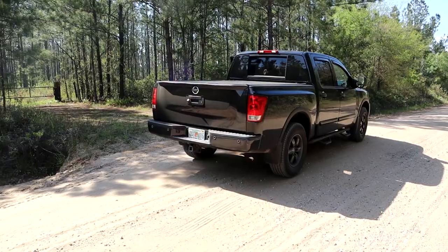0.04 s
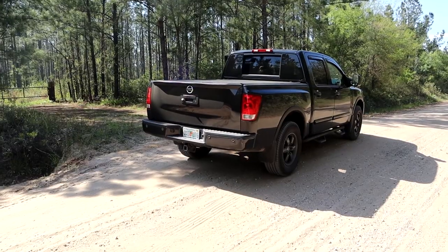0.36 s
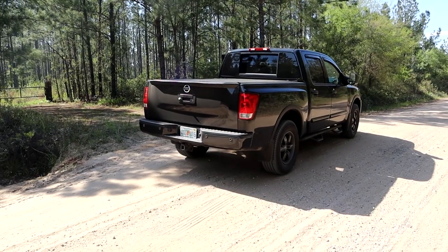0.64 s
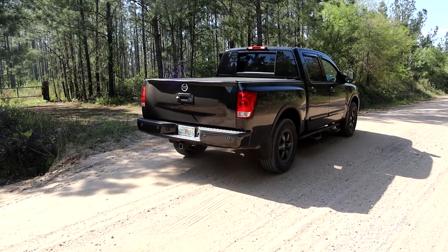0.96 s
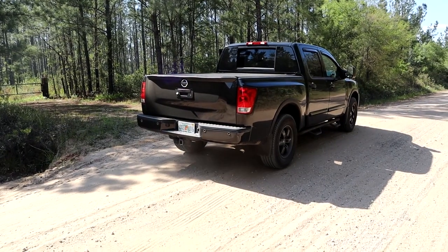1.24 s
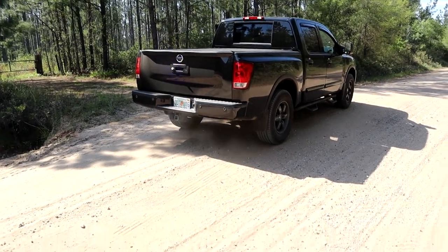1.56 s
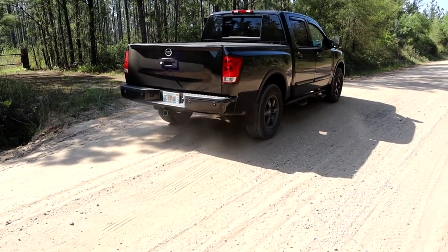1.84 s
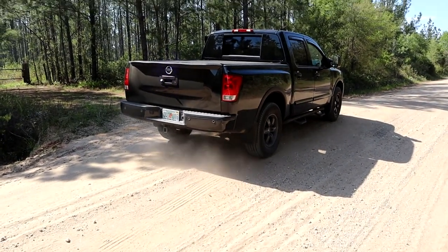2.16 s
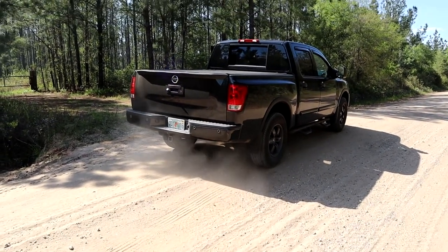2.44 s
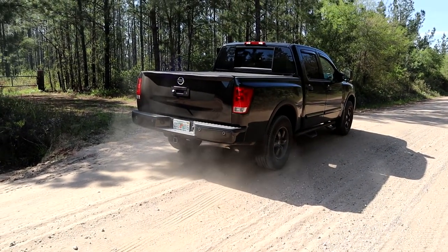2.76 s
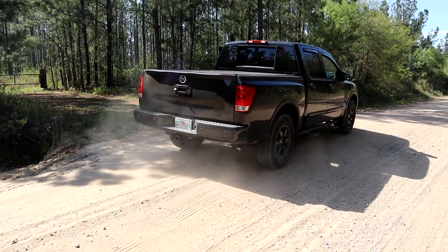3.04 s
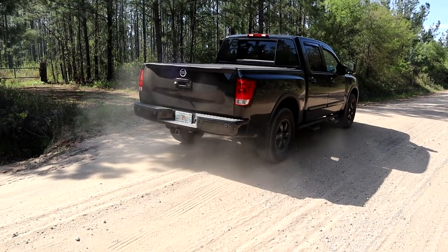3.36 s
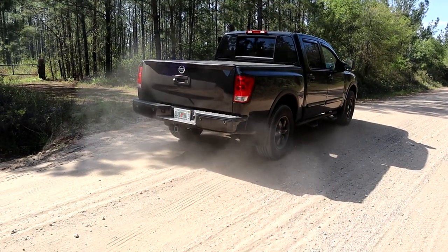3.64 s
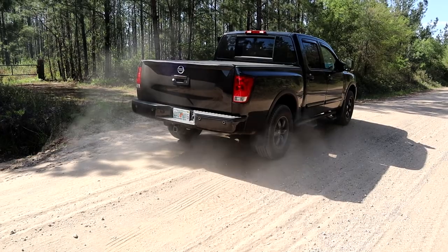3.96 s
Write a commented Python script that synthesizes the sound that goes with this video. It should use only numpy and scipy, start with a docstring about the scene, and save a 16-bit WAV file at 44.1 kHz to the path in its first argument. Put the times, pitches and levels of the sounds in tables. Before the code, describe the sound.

A pickup's V8 revs up from idle in growling stabs, backfires, then winds down.

```python
"""A V8 pickup idles on a sandy road a few metres away, its engine bay whirring, as an insect trills briefly.
At 0.4 s air hisses into the intake, the pipe pops and the revs climb: separate chugs merge into a note,
with a rasp of gas under load. From 1.3 s stabs of throttle spin the rear wheels, which spray sand,
and the tailpipe growls on after each stab. The exhaust burbles on the overrun and backfires at 2.5 s.
After one more stab the revs fall away, with two soft pops near the end."""
import sys
import numpy as np
from scipy import signal
from scipy.fft import rfft, irfft
from scipy.io import wavfile

SR = 44100
rng = np.random.default_rng(int(sys.argv[2]) if len(sys.argv) > 2 else 0)


def transcribe(u):
    """Save the signal u as a 16-bit wav file named by the first command-line argument.

    u: samples, shape (n,) or (channels, n), limited to [-1, 1]; the rate is SR.
    q: integer samples, one column per channel.
    """
    v = np.clip(np.atleast_2d(u).T, -1, 1)
    q = np.round(v * 32767).astype(np.int16)
    wavfile.write(sys.argv[1], SR, q)


N = 176400
T = np.arange(N) / SR

# Fader ride for the exhaust note and its puffs: (time [s], level [dB])
EXHAUST_FADER = [(0, -23.5), (.385, -15), (.405, -8.5), (.5, -9.5), (.7, -9.5), (.8, -13.5), (.95, -21.5),
                 (1.1, -23.5), (1.33, -21), (1.38, -11), (1.55, -17.5), (1.64, -9), (1.75, -15.5),
                 (1.83, -10), (1.95, -14.5), (2.05, -17.5), (2.25, -17.5), (2.44, -11.5), (2.57, -28.5),
                 (2.63, -16), (2.71, -10.5), (2.87, -20.5), (3.08, -19), (3.15, -15), (3.45, -20.5),
                 (3.75, -16), (3.87, -17.5), (4, -14)]
# Body of the pipe and muffler: (frequency [Hz], gain [dB])
PIPE_BODY = [(50.0, 1.5), (80.0, -0.5), (115.0, 6.5), (140.0, 4), (162.0, 7), (190.0, 7), (220.0, -0.8),
             (255.0, 0.47), (300.0, -8), (345.0, -25), (385.0, -23), (460.0, -35.5), (545.0, -26.5),
             (590.0, -29.5), (660.0, -22.5), (760.0, -30), (850.0, -34.5), (1000.0, -46)]
# Voicing of the low harmonics: (multiple of the cycle rate, overrun level [dB], loaded level [dB])
HARMONIC_VOICING = [(2, -29.7, -29.5), (3, -10, -21.5), (4, -14.5, -17.5), (5, -9.5, -6.5), (6, -14.5, -4),
                    (7, -16, -18.5), (8, -10, -0.4), (9, -8, -1.3), (10, -9.6, -2.5), (11, -16.5, -3),
                    (12, -8.5, -0.3), (13, -6.5, 11)]
# The V8's lopsided beat, in firing order: (strength [0-1], share of the bank lag [0-1])
FIRING_PATTERN = [(.9, 0.19), (.15, 0.99), (0.92, 0.98), (.7, 0.047), (.2, 1), (.6, 0.03), (.15, 0.022),
                  (.9, 1)]
BANK_LAG_CYCLES, FULL_LOAD_THROTTLE, LOAD_BRIGHT_DB = .012, .48, 5.5
THUMP_HZ, THUMP_Q, CHUG_HZ, CHUG_Q, CHUG_GAIN, MUFFLER_HZ = 71, .9, 164, 3.3, 2.05, 263
UPPER_DB, UPPER_OVERRUN_DB, UPPER_CONTRAST = 1, -11, 0.44
JITTER_S, OVERRUN_JITTER_S, FIRING_SPREAD_DB, IDLE_SPREAD_DB = .00005, 0.000088, .6, 1.5


def exhaust(rate, cycles, throttle, trim_db=0.28, ceiling=.85):
    """At low revs each firing is a thump and an uneven chug; at speed they merge into a load-shaped note."""
    step = 8  # the note is low, so it is built at an eighth of the sample rate
    rate, cycles, throttle = rate[::step], cycles[::step], throttle[::step]
    load = np.clip(throttle / FULL_LOAD_THROTTLE, 0, 1)
    idle = np.interp(rate, [15, 22], [1, 0])
    # no two firings have quite the same size or timing
    size, slip = [np.interp(8 * cycles, np.arange(1500), v) for v in rng.standard_normal((2, 1500))]
    cycles = cycles + (JITTER_S + OVERRUN_JITTER_S * (1 - load)) * rate * slip
    strength, bank = np.transpose(FIRING_PATTERN)
    fires_at = np.arange(8) / 8 + BANK_LAG_CYCLES * bank
    pipe, pipe_hz = causal_response(PIPE_BODY)[:4096], np.fft.rfftfreq(8192, 1 / SR)[:4096]
    out, power = 0, 0
    for k in range(2, 56):
        hz = k * rate
        pattern = np.sum(strength * np.exp(-2j * np.pi * k * fires_at))
        thump = 8 * (k % 8 == 0) * resonance(hz, THUMP_HZ, THUMP_Q)
        chug = CHUG_GAIN * pattern * resonance(hz, CHUG_HZ, CHUG_Q)
        beat = (1j * thump + chug) / (1 + (hz / MUFFLER_HZ) ** 6)
        if k - 2 < len(HARMONIC_VOICING):
            _, overrun_db, load_db = HARMONIC_VOICING[k - 2]
        else:  # upper harmonics follow the firing pattern
            load_db = UPPER_DB + UPPER_CONTRAST * 20 * np.log10(abs(pattern) + 1e-6)
            overrun_db = load_db + UPPER_OVERRUN_DB
        body = np.interp(hz, pipe_hz, pipe)
        bright_db = LOAD_BRIGHT_DB * throttle * np.interp(hz, [200, 600], [0, 1])
        note = amp(overrun_db + (load_db - overrun_db) * load + bright_db) * np.exp(body.real)
        gain = note ** (1 - idle) * abs(beat) ** idle * np.interp(hz, [1000, 1600], [1, 0])
        smear = np.pi * 0.00807 * np.minimum(hz, 327.3) ** 2 / 200  # higher notes leave the muffler later
        phase = np.angle(beat) + (body.imag - smear) * (1 - idle)
        out = out + gain * np.cos(2 * np.pi * k * cycles + phase)
        power = power + gain ** 2 / 2
    spread_db = FIRING_SPREAD_DB + (IDLE_SPREAD_DB - FIRING_SPREAD_DB) * idle * (1.5 - load)
    out = out / np.sqrt(power) * amp(size * spread_db)
    out = signal.resample_poly(out, step, 1)[:N] * amp(curve(EXHAUST_FADER) + trim_db)
    return out / (1 + (out / ceiling) ** 4) ** (1 / 4)  # the strongest pulses round off


# Soft, dark turbulence inside the pipe: (frequency [Hz], gain [dB])
PUFF_EQ = [(35, -31), (80, -12), (170, -6.5), (290, 1), (420, -19.5), (700, -20), (1050, -42.5),
           (4000, -67)]
# Gritty turbulence at the pipe's mouth: (frequency [Hz], gain [dB])
RASP_EQ = [(390, -1.5), (470, -7.5), (800, 1), (1100, -8.5), (1450, -11), (2000, -14), (3200, -18.5),
           (4300, -25.5), (6500, -39.5), (13000, -60)]
PUFF_TRIM_DB, RASP_FULL_THROTTLE_DB, RASP_RANGE_DB = -19.5, -26.5, 36


def exhaust_gas(cycles, throttle, grit=0.096, decay_firings=0.23):
    """Each firing blows a soft puff in the pipe and, under load, a rasp; both throb once a cycle."""
    firing = 8 * cycles
    size = np.exp(grit * rng.standard_normal(N))[firing.astype(int)]
    pulse = 0.77 + np.exp(-(firing % 1) / decay_firings)
    throb = 1 + 0.27 * np.cos(2 * np.pi * (cycles - 0.093))
    gate = size * pulse * throb
    puff = colour(spread(hiss()) * gate, PUFF_EQ) * amp(curve(EXHAUST_FADER) + PUFF_TRIM_DB)
    rasp = colour(spread(hiss()) * gate, RASP_EQ)
    return puff + rasp * amp(RASP_FULL_THROTTLE_DB + RASP_RANGE_DB * (throttle - 1))


# Cues for the pops and the backfire: (time [s], level [dB], decay [s], tilt [dB/octave])
BANG_CUES = [(.470, -21, 0.0057, -1.5), (0.5, -17, 0.0062, -1.5), (2.507, -6, 0.015, -0.6),
             (2.524, -11, 0.013, 0.6), (3.888, -16.5, 0.017, -4), (3.923, -15.5, 0.016, -4)]
# Boomy tone of a bang in the pipe: (frequency [Hz], gain [dB])
BANG_EQ = [(25, -12), (60, 1.5), (280, 3.5), (450, -14), (700, -3.5), (1100, -18), (4000, -34.5),
           (7000, -47.5), (12000, -64)]


def backfire():
    """Unburnt fuel bangs in the pipe: a pressure front, then a fast-dying burst of noise."""
    out, t = np.zeros((2, N)), T[:SR // 4]
    for start, db, decay, tilt_db in BANG_CUES:
        burst = spread(rng.standard_normal((2, len(t)))) * np.exp(-t / decay)
        burst[:, 0] += 14  # the pressure front
        tone = [(hz, level + tilt_db * np.log2(hz)) for hz, level in BANG_EQ]
        bang = colour(burst, tone) * amp(db) * np.sqrt(decay / 2 / t[-1])
        slot = out[:, round(start * SR):][:, :len(t)]
        slot += bang[:, :slot.shape[1]]
    return out


# Narrow rings of the tailpipe at the reference revs: (frequency [Hz], relative level [dB])
TAILPIPE_RINGS = [(545, -7.5), (658, -1), (728, -7), (795, -9), (852, -8)]
GROWL_REFERENCE_CYCLES_PER_S, GROWL_WIDTH_HZ, GROWL_HOLD_S = 33, 6.4, 0.076


def tailpipe_growl(rate, throttle):
    """The tailpipe rings, a little higher with the revs, and hangs on after each stab."""
    keep, hold = np.exp(-np.pi * GROWL_WIDTH_HZ / SR), np.exp(-1 / (GROWL_HOLD_S * SR))
    revs = rate / GROWL_REFERENCE_CYCLES_PER_S
    bent_time = np.cumsum(revs ** .15) / SR
    rings = 0
    for hz, db in TAILPIPE_RINGS:
        wander = signal.lfilter([1], [1, -keep], [1, 1j] @ hiss())
        ring = wander / np.sqrt(abs(wander)) * np.exp(2j * np.pi * hz * bent_time)
        rings = rings + amp(db) * ring.real
    drive = signal.lfilter([1 - hold], [1, -hold], throttle * revs)
    return unit_rms(rings) * amp(-29 + 17.5 * (drive - 1.5))


# Fader ride for the whir under the bonnet: (time [s], level [dB])
WHIR_FADER = [(0, -39.5), (.4, -40.5), (1.05, -46), (2.15, -41.5), (3.25, -44), (3.6, -48.5), (4, -51.5)]
# Mid-heavy tone of fan and belts: (frequency [Hz], gain [dB])
WHIR_EQ = [(100, -4), (700, 3.5), (1100, -9.5), (2600, -14), (4000, -20), (8000, -34.5), (13000, -43)]


def engine_bay():
    """Fan and belts whir: a bed of noise under the exhaust."""
    return colour(spread(hiss()), WHIR_EQ) * amp(curve(WHIR_FADER))


# Bright, breathy tone of indrawn air: (frequency [Hz], gain [dB])
INTAKE_EQ = [(500, -10.5), (2500, 1.5), (10500, -13.5), (13000, -30.5)]


def intake(peak_s=0.408, rise_s=0.074, fall_s=0.015, peak_db=-41):
    """Air hisses in as the throttle first opens: one swell, cut short."""
    swell = np.exp(-np.maximum((peak_s - T) / rise_s, (T - peak_s) / fall_s))
    return colour(spread(hiss()), INTAKE_EQ) * swell * amp(peak_db)


def insect(hz=8430, sweep_hz=750, chirps_per_s=64, peak_db=-51.5, end_s=0.35):
    """An insect trills at the roadside: quick falling chirps with a noisy edge."""
    progress = T * chirps_per_s % 1
    pitch = hz - sweep_hz * progress + 1500 * hiss()
    chirps = np.sin(2 * np.pi * np.cumsum(pitch, axis=1) / SR) * np.sin(np.pi * progress) ** 4
    fade = np.clip(np.minimum(T / 0.056, (end_s - T) / .02), 0, 1)
    return chirps * fade * amp(peak_db)


# Fader ride for the spray of sand: (time [s], level [dB])
SAND_FADER = [(1.3, -85.5), (1.55, -71.5), (2.1, -63), (2.6, -67)]
# Thin, crisp tone of the grains: (frequency [Hz], gain [dB])
SAND_EQ = [(600, -11.5), (2000, 1), (4000, -1), (13000, -21.5)]


def sand_spray(grains_per_s=1700, spread_db=6):
    """Grains thrown by the spinning tyres land as random ticks of uneven size."""
    ticks = hiss() * (rng.random((2, N)) < grains_per_s / SR)
    size = amp(spread_db * np.minimum(rng.exponential(1, (2, N)), 4))
    return colour(ticks * size, SAND_EQ) * amp(curve(SAND_FADER))


def tree_scatter(x, send_db=-19, t60_s=0.85):
    """Roadside trees scatter back a faint tail with little bass."""
    t = T[:SR]
    tail = rng.standard_normal((2, SR)) * amp(-60 * t / t60_s) * np.minimum(t / .03, 1)
    tail = signal.lfilter(*signal.butter(2, 400, "high", fs=SR), tail)
    return amp(send_db) * signal.fftconvolve(x, tail / np.linalg.norm(tail[0]), axes=1)[:, :N]


# Stereo image of the truck's noise: (frequency [Hz], left-right correlation [-1 to 1])
STEREO_IMAGE = [(150, .99995), (300, .997), (600, .96), (1000, .78), (2000, .45), (8000, -.4)]


def spread(x):
    """Makes two unrelated channels near mono in the bass, wide in the treble."""
    left, right = rfft(x)
    alike = np.clip(spectrum_at(STEREO_IMAGE, np.fft.rfftfreq(x.shape[1], 1 / SR)), -1, 1)
    mid, side = left * np.sqrt(1 + alike), right * np.sqrt(1 - alike)
    return unit_rms(irfft([mid + side, mid - side], x.shape[1]))


def amp(db):
    """Decibels to gain."""
    return 10 ** (np.asarray(db) / 20)


def unit_rms(x):
    """Scales to unit rms."""
    return x / np.sqrt(np.mean(x ** 2) + 1e-20)


def hiss():
    """White noise in two channels."""
    return rng.standard_normal((2, N))


def curve(points):
    """An automation lane, joined by straight lines in time."""
    return np.interp(T, *np.transpose(points))


def spectrum_at(points, hz):
    """Reads a spectrum, joined on a log-frequency axis."""
    f, value = np.transpose(points)
    return np.interp(np.log(hz + 1), np.log(f + 1), value)


def resonance(hz, centre_hz, q):
    """Complex gain of one resonant band."""
    return 1 / (1 + 1j * q * (hz / centre_hz - centre_hz / hz))


def causal_response(eq):
    """Log gain (real part) and phase (imaginary part) of a causal filter with this EQ."""
    gain = amp(spectrum_at(eq, abs(np.fft.fftfreq(8192, 1 / SR))))
    return np.conj(signal.hilbert(np.log(gain)))


def colour(x, eq):
    """Passes two channels through a causal EQ and scales them to unit rms."""
    impulse = np.fft.ifft(np.exp(causal_response(eq))).real[None, :4096]
    return unit_rms(signal.oaconvolve(x, impulse, axes=1)[:, :x.shape[1]])


# The revs, eight firings to a cycle: (time [s], engine speed [cycles/s])
REVS = [(0.0, 6.9), (0.4, 5.47), (0.47, 7.65), (0.55, 10.6), (0.63, 15.5), (0.75, 23.4), (0.85, 28.8),
        (0.98, 28.6), (1.32, 26.1), (1.45, 28.4), (1.58, 29.9), (1.68, 32.7), (1.82, 34.3), (1.94, 38.2),
        (2.03, 38.3), (2.25, 37.1), (2.48, 32.3), (2.6, 30.8), (2.68, 33), (2.75, 34.72), (2.84, 35.9),
        (3.04, 33.8), (3.2, 31.5), (3.6, 23), (4.0, 15.9)]
# The driver's stabs at the pedal: (time [s], throttle [0 shut, about 1 wide open])
PEDAL = [(.43, 0.25), (.5, 0.79), (.59, .88), (.68, 0.94), (.8, 0.63), (.95, 0.16), (1.32, 0.08),
         (1.4, 0.67), (1.57, 0.29), (1.61, 0.79), (1.66, 0.81), (1.76, 0.47), (1.86, 0.98), (1.92, 1.07),
         (2.04, 0.1), (2.6, 0.01), (2.66, 0.77), (2.72, 0.93), (2.87, 0.01), (3.05, 0.02), (3.2, 0.15),
         (3.5, 0)]


def scene():
    """Revs and throttle play the exhaust; the other layers run on their own cues."""
    rate, throttle = curve(REVS), curve(PEDAL)
    cycles = np.cumsum(rate) / SR
    truck = exhaust(rate, cycles, throttle) + exhaust_gas(cycles, throttle) + backfire()
    truck = truck + tailpipe_growl(rate, throttle) + engine_bay() + intake() + sand_spray()
    return truck + tree_scatter(truck) + insect()


# Pan across the spectrum: (frequency [Hz], left minus right [dB])
SPECTRAL_PAN = [(100, -.1), (500, -.6), (1000, -3.6), (2000, -5.4), (4000, -1.8)]


def record(dry, top_hz=13500):
    """The treble leans right; the mix clips at full scale, then a low-pass trims the top."""
    lean_db = spectrum_at(SPECTRAL_PAN, np.fft.rfftfreq(N, 1 / SR)) / 2
    panned = irfft(rfft(dry) * amp([lean_db, -lean_db]))
    lowpass = signal.firwin(511, top_hz, window=("kaiser", 9), fs=SR)
    return signal.oaconvolve(np.clip(panned, -1, 1), lowpass[None], "same")


dry = scene()
out = record(dry)
transcribe(out)
```